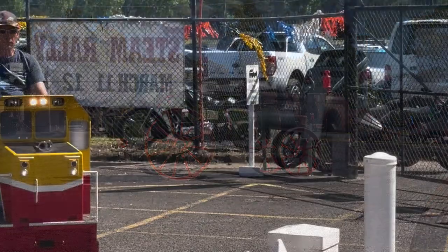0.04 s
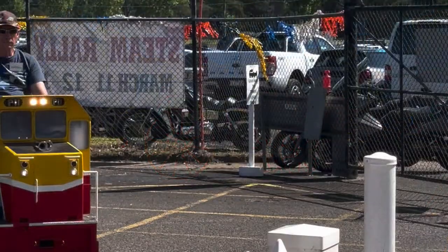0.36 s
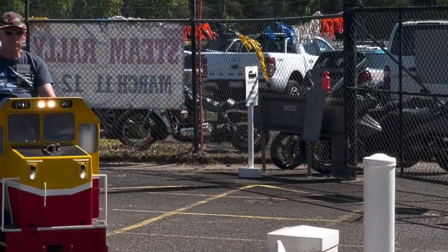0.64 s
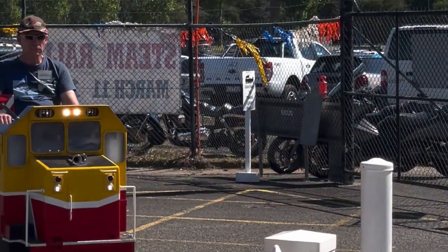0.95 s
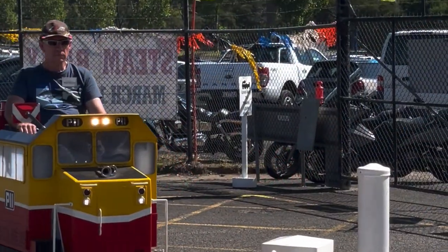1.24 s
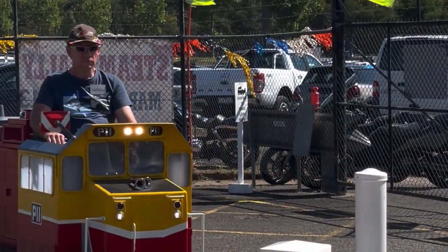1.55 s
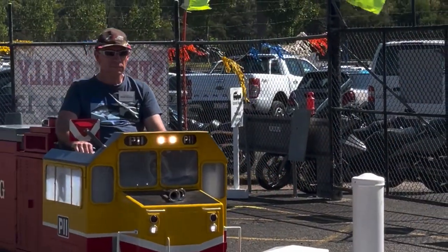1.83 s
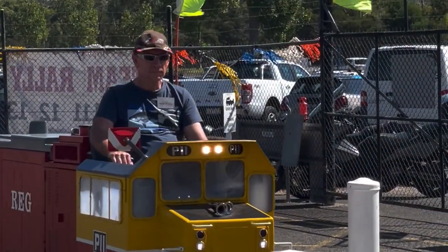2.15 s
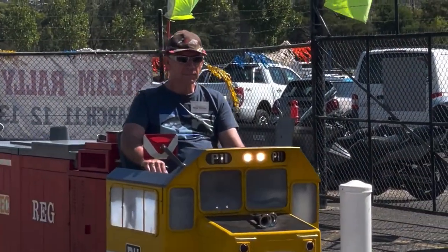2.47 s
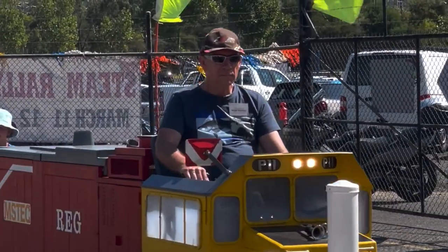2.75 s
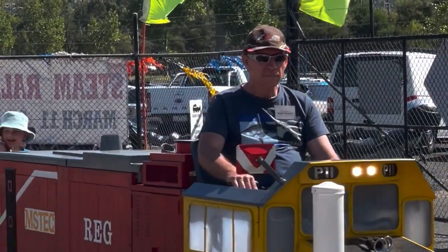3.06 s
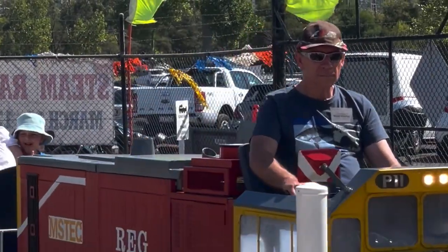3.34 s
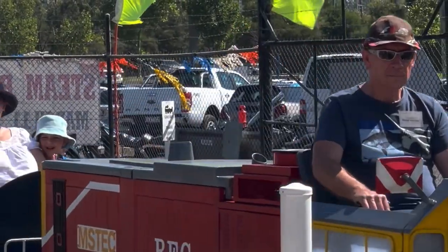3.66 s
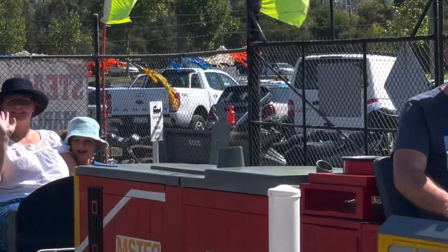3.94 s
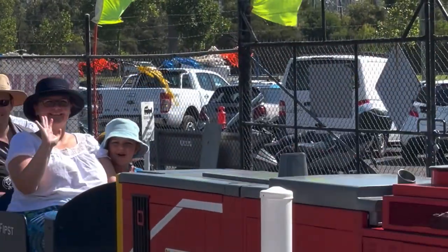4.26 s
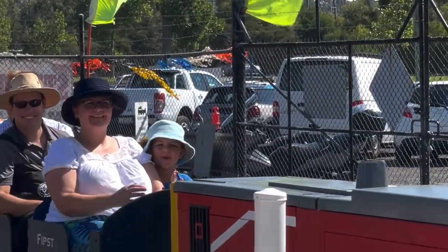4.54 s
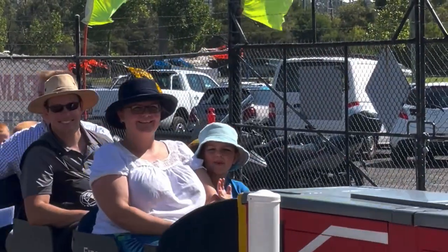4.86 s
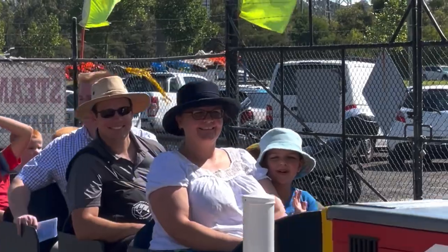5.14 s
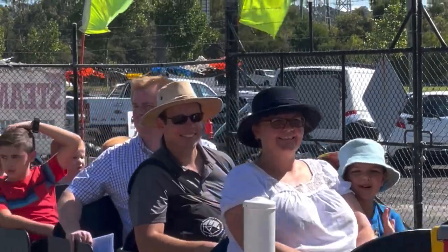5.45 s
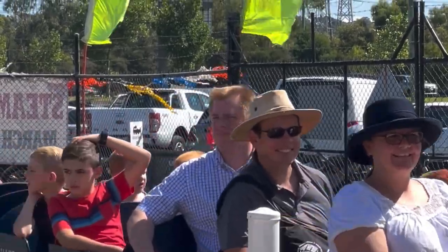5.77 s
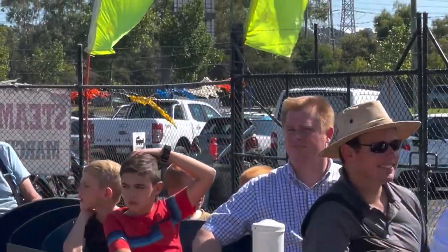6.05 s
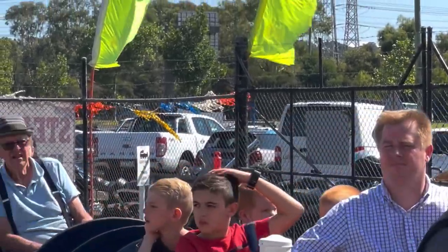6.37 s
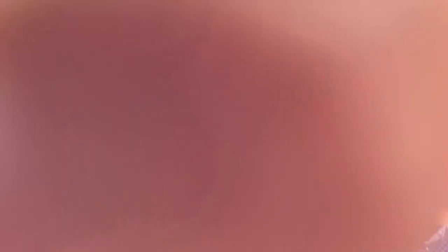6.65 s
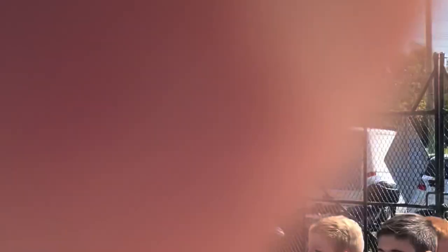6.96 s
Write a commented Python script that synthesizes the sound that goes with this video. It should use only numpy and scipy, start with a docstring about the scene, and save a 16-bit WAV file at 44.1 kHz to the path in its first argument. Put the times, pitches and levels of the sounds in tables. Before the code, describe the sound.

A small, bright warning bell is struck about two and a half times a second as a miniature ride-on train approaches. Its engine drones with a throbbing whine, and the carriages rumble past with faint squeaks and a few clunks over a rail joint. Near the end a buzzy horn toots twice. A slow engine thuds further off in a soft fairground wash, all heard from the trackside.

```python
"""Miniature train at the fair

A ride-on train rolls past while a small warning bell is struck 2.5 times a second. The locomotive's
engine drones and whines; the carriages rumble, squeak and clunk over a rail joint; the horn toots twice.
A slow engine thuds further off in the wash of the fairground. All is heard from the trackside,
through two closely spaced microphone ports."""
import sys
import numpy as np
from scipy import signal
from scipy.fft import rfft, irfft, next_fast_len
from scipy.io import wavfile
from scipy.ndimage import uniform_filter1d

SR = 44100
rng = np.random.default_rng(int(sys.argv[2]) if len(sys.argv) > 2 else 0)


def transcribe(u):
    """Save the signal u as a 16-bit wav file named by the first command-line argument.

    u: samples, shape (n,) or (channels, n), limited to [-1, 1]; the rate is SR.
    q: integer samples, one column per channel.
    """
    v = np.clip(np.atleast_2d(u).T, -1, 1)
    q = np.round(v * 32767).astype(np.int16)
    wavfile.write(sys.argv[1], SR, q)


N = 313211
t = np.arange(N) / SR
SIZE = next_fast_len(N + SR)
FREQS = np.maximum(np.fft.rfftfreq(SIZE, 1 / SR), 1)


def undb(db):
    """Decibels to gain."""
    return 10 ** (np.asarray(db) / 20)


def curve(table):
    """A fader ride: breakpoints joined by straight lines in time."""
    return np.interp(t, *np.transpose(table))


def across(table, hz):
    """An EQ curve read on a log-frequency axis."""
    rows = np.array(table)
    return np.interp(np.log(hz), np.log(rows[:, 0]), rows[:, 1])


def shape(x, gain):
    """Filter by a gain for each frequency."""
    return irfft(rfft(x, SIZE) * gain, SIZE)[..., :N]


def walk(rate_hz):
    """Smooth random wander of spread near 1."""
    knots = rng.standard_normal(N // 20)
    return 1.245 * np.interp(t * rate_hz, np.arange(len(knots)), knots)


def fade(age, t60):
    """Exponential decay, silent before the hit."""
    return (age >= 0) * np.exp(-np.log(1000) * np.maximum(age, 0) / t60)


def add(out, s, sound):
    """Mix a sound in at s seconds."""
    i = int(s * SR)
    part = sound[:max(N - i, 0)]
    out[i:i + len(part)] += part


# stereo width of diffuse sound: f/Hz, side minus mid/dB
WIDTH = [(60, -27), (160, -19), (340, -12), (480, -5.5), (1000, -7), (1650, -4), (2000, -14), (5000, -20)]

def noise(spectrum):
    """Diffuse stereo noise; the spectrum gives the mid channel's level per Hz."""
    mid, side = rng.standard_normal((2, N)) * np.sqrt(SR / 2)
    side = shape(side, undb(across(WIDTH, FREQS)))
    return shape(np.array([mid + side, mid - side]), undb(across(spectrum, FREQS)))


# ambience bed: f/Hz, level/dB
FAIR_EQ = [(25, -68), (50, -59), (100, -52.5), (250, -65.5), (500, -80), (750, -65), (1000, -69),
           (1400, -66.5), (2000, -72.5), (3300, -78.5), (4600, -89.5), (7500, -84.5), (10000, -101),
           (13000, -107), (16000, -120)]

def fairground(drift_db=.8):
    """The steady wash of the fair, drifting slightly in level."""
    return noise(FAIR_EQ) * undb(drift_db * walk(6))


# tone of the exhaust: f/Hz, level/dB
EXHAUST_EQ = [(53, 0), (106, -5), (160, -8), (212, -12), (320, -16.5), (640, -40.5), (1200, -38),
              (2500, -32)]
# fader ride on the drone: t/s, gain/dB
ENGINE_RIDE = [(.65, -33.5), (1.1, -35.5), (2.0, -32.5), (2.7, -26), (3.1, -34.5), (4.25, -27.5),
               (5.2, -28.5), (6.3, -24.5), (7.1, -24.5)]

def engine(firing_hz=53, wander=0.0076, scatter_db=1.5, lope=0.24):
    """Exhaust pulses of uneven strength; their overtones blur as the speed wavers."""
    phase = 2 * np.pi * np.cumsum(firing_hz * (1 + wander * walk(14))) / SR
    pulses = sum(undb(across(EXHAUST_EQ, k * firing_hz)) * np.sin(k * phase + 2 * np.pi * rng.random())
                 for k in range(1, 25))
    uneven = undb(scatter_db * walk(firing_hz)) * (1 + lope * np.sin(phase / 2))
    return np.sqrt(2) * pulses * uneven * undb(curve(ENGINE_RIDE))


# fader rides on the whine and the gear tone: t/s, gain/dB
WHINE_RIDE = [(0.65, -48.5), (1.6, -36.5), (2.2, -33.5), (2.95, -44.5), (4.1, -34.5), (7.1, -46.5)]
GEAR_RIDE = [(.65, -60), (2.6, -50), (3.0, -42), (4.2, -41), (4.9, -34), (5.4, -43), (7.1, -52)]

def drive(whine_hz=625, throb_hz=10, whine_db=-2, gear_hz=582, wander=0.0047):
    """Two drive tones; the upper one throbs with a turning shaft."""
    def tone(hz):
        return np.sqrt(2) * np.sin(2 * np.pi * np.cumsum(hz * (1 + wander * walk(12))) / SR)
    throb = 1 + .5 * np.cos(2 * np.pi * throb_hz * (t - .025))
    whine = tone(whine_hz) * throb * undb(curve(WHINE_RIDE) + whine_db)
    return whine + tone(gear_hz) * undb(curve(GEAR_RIDE))


# chassis rumble, wheel roar and rail hiss: f/Hz, relative level/dB
RUMBLE_EQ = [(25, -29), (45, -11), (75, -2), (110, -3.5), (170, 0.5), (250, -8.5), (450, -23.5), (900, -60)]
ROAR_EQ = [(120, -23), (250, -1.5), (450, -2), (750, -5), (1100, -11.5), (1450, -14), (1720, -20),
           (2000, -16.5), (3200, -26), (4500, -45), (9000, -55)]
HISS_EQ = [(1500, -49), (3500, -27), (5000, -30.5), (8500, -31.5), (10000, -44.5), (13000, -34.5),
           (15500, -67), (16500, -58)]
# fader ride on the rumble: t/s, gain/dB
RUMBLE_RIDE = [(.65, -36.5), (1.25, -34.5), (1.55, -29), (2.4, -26), (3.1, -33.5), (3.4, -27), (5.1, -31),
               (7.1, -29)]

def rolling(rumble_db=-21, jolt_db=3, roar_db=-51, hiss_db=-47.5, grit_db=1.22):
    """The chassis rumbles in jolts; steel wheels roar and hiss on rough rails as they come near."""
    speed_m_s, track_distance_m, closest_s = 2.27, 3.02, 6.07
    nearness = track_distance_m / np.hypot(track_distance_m, speed_m_s * (t - closest_s))
    rumble = noise(RUMBLE_EQ) * undb(curve(RUMBLE_RIDE) + rumble_db + jolt_db * walk(30))
    roar = noise(ROAR_EQ) * undb(roar_db) * nearness ** 1.16
    hiss = noise(HISS_EQ) * undb(hiss_db) * nearness ** 1.65
    return rumble + (roar + hiss) * undb(grit_db * walk(90))


# clapper hits, coloured by the contact point: t/s, gain/dB in each of four bands, hum level/dB
STRIKES = [(0.6375, -0.5, -0.5, -10, -3.5, -31), (1.009, 3.5, 3, -1, 1, -39), (1.4163, -5, -1, -6, -2, -35),
           (1.8108, -1, 2, 1, 1.5, -34.5), (2.2183, -0.5, 1, 1, -2.5, -36.5),
           (2.6153, 3.5, 2.5, -1.5, -2.5, -41.5), (3.0199, -5, 1.5, -2, 2, -40),
           (3.418, 2.5, 0.5, 4.5, 0, -41), (3.8245, -2, 0, 3, 2, -35.5), (4.2197, 2, -7.5, -6.5, 0, -42),
           (4.6267, -1.5, 0.5, 2.5, 1, -41), (5.0212, 2.5, 0, 1.5, 3, -40.5), (5.43, -6, -6.5, -5, -2, -42),
           (5.8284, -2, 2, -1.5, 0, -35.5), (6.2353, -0.5, -1, -1, 0, -32),
           (6.633, -2, -1.5, 4.5, -0.5, -39), (7.0405, -17, -7, -3, -2, -53)]
# centres of those bands: f/Hz
COLOUR_BANDS = [2625, 3884, 6933, 12874]
# the bell's partials: f/Hz, relative level/dB, t60/s
BELL_MODES = [(1237, -47, 4), (2482, -43, 1.1), (2625, -19.8, 1.1), (2789, -45, 1.1), (3883.6, -19.2, 1.02),
              (5313, -31, .7), (5338, -42, .6), (6933, -25, .64), (8130, -35, .08), (8613, -33, .3),
              (8726.5, -18, .36), (9170, -36, .12), (10150, -35, .1), (10250, -35, .2), (10708, -24.5, .38),
              (11770, -38, .12), (12874, -20, .32), (13200, -37, .26), (14547, -35, .28), (15227, -21, .17)]
# the clapper's own click: f/Hz, relative level/dB
CLICK_EQ = [(1500, -110), (2700, -55), (4600, -77), (5600, -52), (6400, -75.5), (8400, -52.5), (9700, -74),
            (13000, -57), (14200, -66), (15400, -74), (16800, -119)]

def bell(click_t60=0.087, click_db=-1, shimmer_db=0.98, hum_hz=1537.6, hum_t60=5.2, contact_db=1.5):
    """Each strike rings the inharmonic modes over what is still sounding; the high ones die first."""
    age = t[:3 * SR // 2]
    hz, db, t60 = np.transpose(BELL_MODES)
    rings = np.array([fade(age, d) * np.exp(2j * np.pi * f * age) for f, d in zip(hz, t60)])
    # the bell is not quite round: each mode beats with a slightly sharper twin
    twin_detune, twin_gain = .0007, .1
    twins = rings * np.exp(2j * np.pi * twin_detune * hz[:, None] * age)
    high = hz > 5000
    # one pair of partials grows louder as the locomotive goes by
    swelling = high & (hz < 5600)
    swell_start_db, swell_db_per_s = -7, 1.78
    ring, clicks, hum = np.zeros((3, N))
    for s, *colour_db, hum_db in STRIKES:
        twin_share = twin_gain * np.exp(2j * np.pi * rng.random(len(hz)))
        swell_db = swelling * (swell_start_db + swell_db_per_s * s)
        # the high partials are the most sensitive to where the clapper lands
        chance_db = contact_db * high * rng.standard_normal(len(hz))
        mode_db = db + swell_db + chance_db + np.interp(hz, COLOUR_BANDS, colour_db)
        gains = undb(mode_db) / (1 + twin_share)
        add(ring, s, (gains @ rings + (gains * twin_share) @ twins).imag)
        add(clicks, s, undb(click_db + np.mean(colour_db) / 2) * fade(age, click_t60))
        # the hum outlasts the gap between strikes: each one feeds or checks it to a new level
        hum = np.where(t < s, hum, undb(hum_db) * fade(t - s, hum_t60))
    hum_note = np.sqrt(2) * np.sin(2 * np.pi * hum_hz * t) * uniform_filter1d(hum, int(.017 * SR))
    shimmer = undb(shimmer_db * walk(30))  # reflections off the moving carriages
    return ring * shimmer + hum_note + clicks * noise(CLICK_EQ)


def slow_engine(thud_hz=84, thud_t60=0.078, rise_s=0.0059, thud_db=-5, scatter_db=0.5, fade_db_per_s=1):
    """Each exhaust beat is a few cycles of a low pipe note; the even beats quicken a little."""
    out, age = np.zeros(N), t[:SR // 4]
    envelope = (1 - np.exp(-age / rise_s)) * fade(age, thud_t60)
    s, gap_s, quicken_s = .695, .2018, .00044
    for detune, strength in rng.standard_normal(size=(32, 2)):
        hz = thud_hz * (1 + 0.13 * detune)
        db = thud_db + scatter_db * strength - fade_db_per_s * s
        add(out, s, undb(db) * envelope * np.sin(2 * np.pi * hz * age))
        s += gap_s
        gap_s -= quicken_s
    return out


# faint squeaks: t/s, length/s, start f/Hz, end f/Hz, level/dB, roughness (0-1)
SQUEAKS = [(1.58, .15, 2110, 2090, -47, .2), (1.72, .12, 1530, 1410, -36, .2),
           (2.08, .15, 1780, 1755, -45, .2), (4.89, .13, 1880, 1950, -33, 1),
           (4.91, .1, 5850, 5950, -42, .5)]

def flanges(scrape_db=-21, pitch_spread=.035):
    """Short gliding squeaks, scratchy and hissing when the wheel flange slips unevenly."""
    tones, scrape = np.zeros((2, N))
    for s, length, start_hz, end_hz, db, rough in SQUEAKS:
        n = int(length * SR)
        hz = np.linspace(start_hz, end_hz, n) * (1 + pitch_spread * rough * walk(600)[:n])
        swell = undb(db) * np.sqrt(2 * np.hanning(n))
        add(tones, s, swell * np.sin(2 * np.pi * np.cumsum(hz) / SR))
        add(scrape, s, swell * rough ** 2)
    return tones + undb(scrape_db) * scrape * noise(HISS_EQ)


# coupling cues: t/s, gain/dB
TICKS = [(2.766, -14), (4.03, -10), (4.367, -10)]

def couplings(tick_t60=0.016, tick_db=-28):
    """Slack couplings give small dry ticks."""
    return noise(HISS_EQ) * sum(undb(db + tick_db) * fade(t - s, tick_t60) for s, db in TICKS)


# wheel hits on the joint: t/s, clunk gain/dB, ring level/dB
WHEEL_HITS = [(5.386, 1.5, -29), (5.713, -0.5, -46), (6.589, -1.5, -46), (6.922, -4, -50)]
# body tone of a carriage: f/Hz, relative level/dB
CARRIAGE_EQ = [(90, -47), (205, -35), (310, -38), (452, -34), (700, -42), (1000, -36), (1400, -41),
               (2000, -53), (4000, -60), (8000, -66), (15000, -80)]

def rail_joint(clunk_t60=0.017, landing_s=0.0045, clunk_db=-1, rattle_db=-14, rattle_t60=0.18,
               wheel_hz=3730, wheel_t60=0.95, upper_hz=7595, upper_db=-43):
    """A wheel drops off one rail and lands on the next: the carriage clunks, the wheel rings on."""
    blows, ring = np.zeros((2, N))
    age = t[:SR]
    drop_and_landing = fade(age, clunk_t60) + fade(age - landing_s, clunk_t60)
    rattle = undb(rattle_db) * fade(age, rattle_t60)
    upper_mode = undb(upper_db) * np.sin(2 * np.pi * upper_hz * age)
    for s, db, ring_db in WHEEL_HITS:
        add(blows, s, undb(db + clunk_db) * (drop_and_landing + rattle))
        lower_mode = undb(ring_db) * np.sin(2 * np.pi * wheel_hz * age)
        add(ring, s, (lower_mode + upper_mode) * fade(age, wheel_t60))
    return blows * noise(CARRIAGE_EQ) + ring


# horn cues: on t/s, off t/s, gain/dB
TOOTS = [(6.718, 6.944, 2.5), (7.026, 7.2, 1.5)]
# the horn's buzz: harmonic number, relative level/dB
HORN_PARTIALS = [(1, -16.5), (2, -19.5), (3, -27.5), (4, -32), (5, -43), (6, -45), (7, -35), (8, -48),
                 (9, -51), (10, -44), (11, -52), (12, -53), (14, -51), (16, -53), (18, -50), (20, -52)]

def horn(horn_hz=390, attack_s=0.013, release_t60=0.076, waver_db=2, jitter=0.002):
    """An electric diaphragm horn: one steady buzz whose upper partials waver."""
    gate = sum(undb(db) * np.clip((t - on) / attack_s, 0, 1) * fade(np.maximum(t - off, 0), release_t60)
               for on, off, db in TOOTS)
    phase = 2 * np.pi * np.cumsum(horn_hz * (1 + jitter * walk(150))) / SR
    buzz = np.zeros(N)
    for k, db in HORN_PARTIALS:
        gain = undb(db + waver_db * min(k / 4, 1) * walk(12))
        buzz += gain * np.sin(k * phase + 2 * np.pi * rng.random())
    left = np.sqrt(2) * gate * buzz
    # the low partials reach the right side later and weaker
    shade_hz, shade_db, lag_s = 1800, -5, .00098
    shade = undb(shade_db) * np.exp(-2j * np.pi * FREQS * lag_s)
    right = shape(left, np.where(FREQS < shade_hz, shade, 1))
    return np.array([left, right])


def yard_echoes(x, wet_db=-23, t60=.4, predelay_s=.018):
    """Adds weak scattered echoes from parked cars and sheds."""
    tail = rng.standard_normal(SR) * fade(t[:SR] - predelay_s, t60)
    return x + undb(wet_db) * shape(x, rfft(tail / np.linalg.norm(tail), SIZE))


def scene():
    """The mix: train and slow engine over the fair; only bell, rail joint and horn get echoes."""
    bed = fairground()
    train = engine() + drive() + rolling() + couplings() + flanges()
    return yard_echoes(bell() + rail_joint() + horn()) + train + slow_engine() + bed


# balance between the ports: f/Hz, left minus right/dB
PORT_BALANCE = [(130, 0), (240, 2), (340, 4), (620, 6), (1000, 2), (1300, 4.5), (1700, 5), (2200, 0)]
# phase between the ports: f/Hz, left lead/rad
PORT_PHASE = [(130, 0), (450, .3), (800, -.1), (1600, .7), (2625, .6), (3884, .6), (5313, 0), (6933, 1.35),
              (8727, 2.4), (10708, 3.45), (12874, 4.8), (14000, 6.25)]

def record(dry, start_s=.635, low_cut_hz=37, ceiling=.92, high_cut_hz=16700):
    """The ports favour the left in the mids and differ in phase up top; the sound cuts in abruptly."""
    lean = undb(across(PORT_BALANCE, FREQS))
    left = lean * np.sqrt(2 / (1 + lean ** 2))
    right = left / lean * np.exp(-1j * across(PORT_PHASE, FREQS))
    low_cut = 1 / np.sqrt(1 + (low_cut_hz / FREQS) ** 10)
    heard = shape(dry, np.array([left, right]) * low_cut) * (t >= start_s)
    soft_clipped = heard / (1 + (heard / ceiling) ** 6) ** (1 / 6)
    high_cut = signal.ellip(10, .2, 80, high_cut_hz, fs=SR, output="sos")
    return signal.sosfilt(high_cut, soft_clipped)


dry = scene()
out = record(dry)
transcribe(out)
```